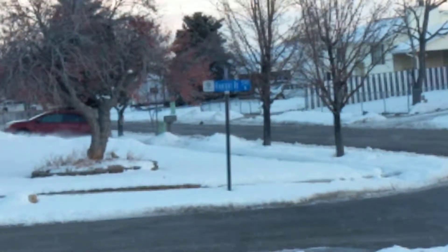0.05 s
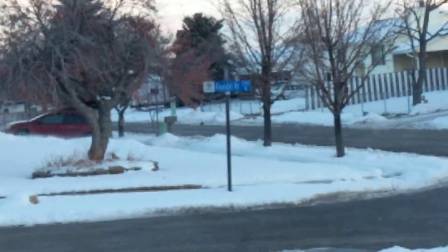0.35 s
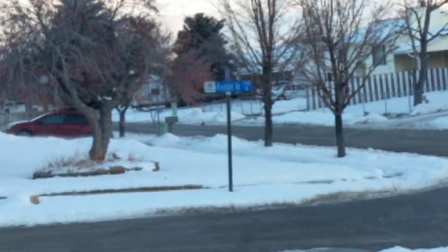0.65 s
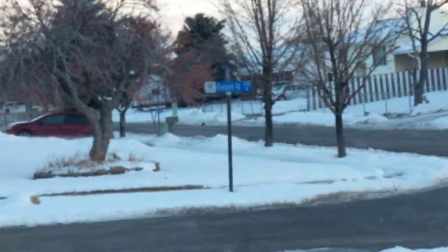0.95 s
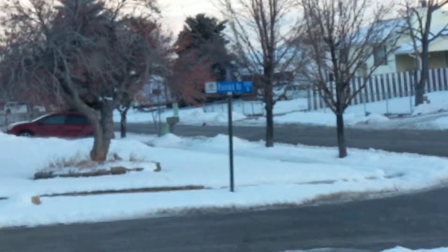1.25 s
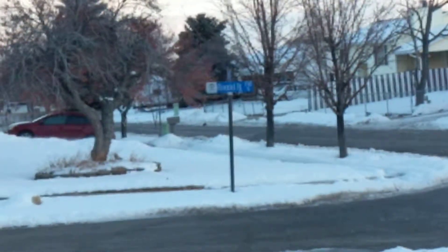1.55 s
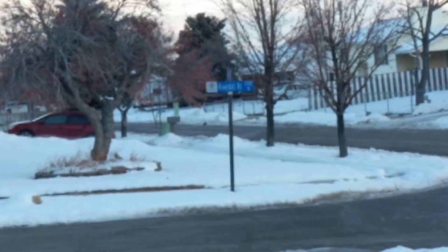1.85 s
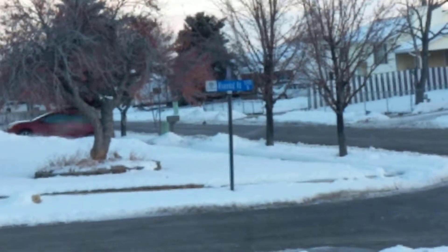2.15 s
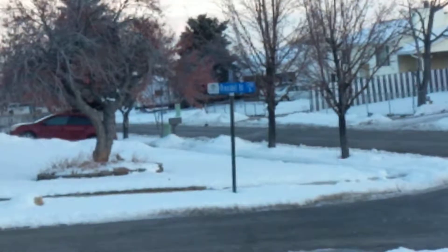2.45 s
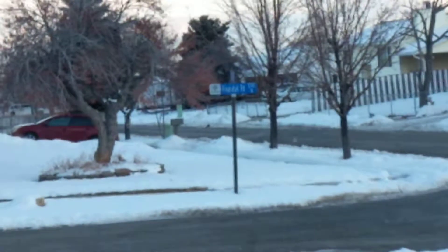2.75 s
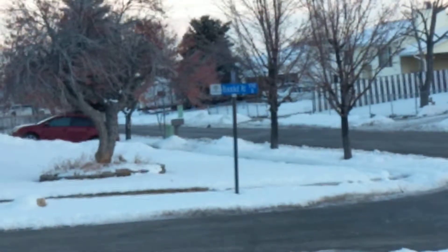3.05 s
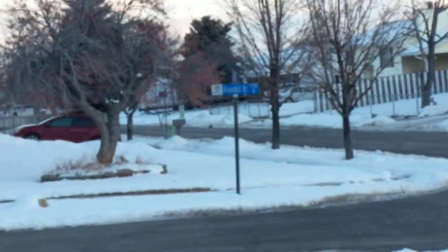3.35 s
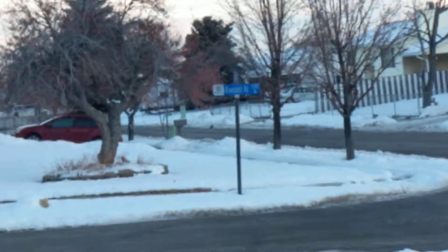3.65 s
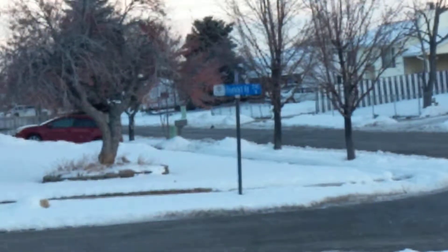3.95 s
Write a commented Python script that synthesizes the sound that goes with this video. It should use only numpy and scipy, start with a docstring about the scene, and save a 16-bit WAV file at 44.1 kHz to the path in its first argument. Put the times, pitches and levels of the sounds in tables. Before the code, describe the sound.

Wind flutters against the microphone with a low rumble, first in a few short puffs, then in a stronger gust towards the end. Behind it, a quiet street holds faint far-off traffic and air rushing softly through bare trees.

```python
"""A quiet, snowy residential street. Puffs of light wind bump against the microphone: a cluster after
two seconds and a stronger gust near the end. Each puff is a dull flutter of pressure from large eddies,
brightened by small ones. Behind them distant traffic murmurs, with tyre noise and one engine's drone,
and a soft rush of air in the bare trees lies over the even hiss of the microphone."""
import sys
import numpy as np
from scipy import signal
from scipy.fft import rfft, irfft, next_fast_len
from scipy.io import wavfile
from scipy.ndimage import uniform_filter1d, map_coordinates

SR = 44100
rng = np.random.default_rng(int(sys.argv[2]) if len(sys.argv) > 2 else 0)


def transcribe(u):
    """Save the signal u as a 16-bit wav file named by the first command-line argument.

    u: samples, shape (n,) or (channels, n), limited to [-1, 1]; the rate is SR.
    q: integer samples, one column per channel.
    """
    v = np.clip(np.atleast_2d(u).T, -1, 1)
    q = np.round(v * 32767).astype(np.int16)
    wavfile.write(sys.argv[1], SR, q)


N = 176400

# Wind hits on the microphone: start_s, hold_s, level_db, small_eddies_relative_db
WIND_PUFFS = [(1.696, .01, -46, -15.5), (1.742, 0.009, -52, -16), (1.843, 0.015, -56, -16),
              (1.932, 0.046, -53, -29), (2.067, 0.023, -40.5, -26), (2.206, 0.024, -42, -25),
              (2.242, 0.029, -39.5, -16), (2.309, 0.03, -51, -21), (2.374, 0.027, -43.5, -26),
              (2.456, 0.017, -43, -12), (2.513, 0.053, -51, -6.5), (2.935, 0.023, -49.5, -10),
              (3.150, 0.016, -56, -16), (3.267, .05, -58.5, -20), (3.324, .065, -49.5, -21),
              (3.527, 0.029, -53, -17), (3.579, .035, -46.5, -19), (3.627, 0.031, -43, -10.5),
              (3.686, 0.085, -43, -10), (3.749, 0.027, -37.5, -3.5), (3.787, 0.027, -35, -19),
              (3.836, .015, -43.5, -5), (3.886, 0.028, -37.5, -20), (3.97, .04, -50.5, -16.5)]
# The deep body of a puff: frequency_hz, level_db
LARGE_EDDY_TONE = [(12, -40), (22, -23.5), (32, -11.5), (48, 4), (72, 3.5), (105, -10), (150, -27),
                   (260, -49), (500, -68), (1000, -100)]
# Its brighter flutter: frequency_hz, level_db
SMALL_EDDY_TONE = [(30, -25), (80, 4), (125, 7), (170, -3), (240, -14.5), (400, -26), (600, -45),
                   (1200, -99)]

def wind():
    """Eddies buffet the microphone in puffs that rise, hold and die away, with the deepest lows cut."""
    attack_s, decay_s, low_cut_hz = 0.011, 0.015, 31
    t = np.arange(N) / SR
    large_power, small_power = np.zeros(N), np.zeros(N)
    for start_s, hold_s, level_db, small_relative_db in WIND_PUFFS:
        rise = np.sin(np.pi / 2 * np.clip((t - start_s) / attack_s, 0, 1)) ** 2
        fall = np.exp(-np.maximum(t - start_s - attack_s - hold_s, 0) / decay_s)
        large_power += (amp(level_db) * rise * fall) ** 2
        small_power += (amp(level_db + small_relative_db) * rise * fall) ** 2
    body = np.sqrt(large_power) * flutter(LARGE_EDDY_TONE, size=900)
    edge = np.sqrt(small_power) * flutter(SMALL_EDDY_TONE, size=1200)
    low_cut = signal.butter(2, low_cut_hz, "highpass", fs=SR, output="sos")
    return signal.sosfilt(low_cut, body + edge)


# Low rumble of far roads: frequency_hz, level_db
MURMUR_TONE = [(12, -53), (22, -29), (35, -8), (58, 2), (75, 0), (95, -6), (135, -6.5), (170, -13),
               (230, -11.5), (330, -22), (500, -37.5), (1000, -61), (4000, -90)]
# Fader ride on the rumble: time_s, level_db
MURMUR_RIDE = [(0, -60), (.7, -60), (1.35, -58.5), (2.0, -61), (2.8, -60), (3.2, -58.5), (4, -60)]
# Muffled wash of far tyres: frequency_hz, level_db
TYRE_TONE = [(60, -22), (250, 1), (420, 1), (600, -2.5), (1000, -8), (2000, -16), (5000, -43), (15000, -67)]
# Fader ride on the tyres: time_s, level_db
TYRE_RIDE = [(0, -72.5), (.8, -71.5), (1.25, -71), (1.9, -72), (2.45, -75.5), (2.65, -72), (3.2, -70),
             (3.5, -73.5), (4, -74)]

def traffic():
    """Far roads merge into a low murmur; tyre noise swells and ebbs above it."""
    murmur = amp(curve(MURMUR_RIDE) + 0.43 * wobble(4.2)) * flutter(MURMUR_TONE, size=6000)
    tyres = amp(curve(TYRE_RIDE) + 0.62 * wobble(10)) * noise(TYRE_TONE)
    return murmur + tyres


def engine_drone():
    """A far engine holds one low note, unsteady in pitch and level."""
    pitch_hz = 60.97 + 3.01 * wobble(5)
    level_db = -70.5 + 4.3 * wobble(8.3)
    phase = 2 * np.pi * np.cumsum(pitch_hz) / SR
    return amp(level_db) * np.sqrt(2) * np.sin(phase)


# Soft rush of air in the bare trees: frequency_hz, level_db
RUSH_TONE = [(100, -20), (700, -1), (1800, 1), (3500, -0.5), (5000, -3.5), (7500, -10), (11000, -20.5),
             (16000, -19)]
# Fader ride on the rush: time_s, level_db
RUSH_RIDE = [(0, -75), (1.35, -75.5), (1.9, -74.5), (2.5, -74.5), (2.85, -75.5), (3.35, -74.5),
             (3.55, -74.5), (4, -74.5)]
# Brief dips in the rush: centre_s, gain_db
RUSH_LULLS = [(.45, -2.5), (.98, -1.5), (2.03, -2.5), (2.74, -2.5)]
# The microphone's noise floor: frequency_hz, level_db
HISS_TONE = [(100, 0.5), (5000, -7.5), (10000, -1.5), (14000, -0.5), (16000, .5)]

def air_and_hiss():
    """Air rushes faintly through the trees over the microphone's hiss; both flicker slightly in level."""
    lull_half_width_s, hiss_db = 0.031, -80.5
    t = np.arange(N) / SR
    lull_db = sum(gain_db * np.exp(-((t - centre_s) / lull_half_width_s) ** 2)
                  for centre_s, gain_db in RUSH_LULLS)
    flicker_db = 0.6 * wobble(18) + 0.86 * wobble(90)
    rush = amp(curve(RUSH_RIDE) + lull_db + flicker_db) * noise(RUSH_TONE)
    hiss = amp(hiss_db + 0.5 * flicker_db + 0.6 * wobble(300)) * noise(HISS_TONE)
    return rush + hiss


def amp(db):
    """Decibels to gain."""
    return 10 ** (np.asarray(db) / 20)


def unit(x):
    """Scale to rms 1."""
    return x / np.sqrt(np.mean(x ** 2) + 1e-20)


def curve(points):
    """Straight ramps between (time_s, value) points, one value per sample."""
    return np.interp(np.arange(N) / SR, *np.transpose(points))


def wobble(rate):
    """A smooth random curve, rate knots a second."""
    knots = rng.standard_normal(int(N * rate / SR) + 4)
    return map_coordinates(knots, [np.arange(N) * rate / SR])


def noise(spectrum):
    """Noise of rms 1, shaped by a (frequency_hz, level_db) curve."""
    fft_size = next_fast_len(N + 8192)
    hz, db = np.transpose(spectrum)
    bin_hz = np.fft.rfftfreq(fft_size, 1 / SR)
    gain = amp(np.interp(np.log(bin_hz + 1), np.log(hz + 1), db))
    white = rng.standard_normal(fft_size)
    return unit(irfft(rfft(white) * gain, fft_size)[:N])


def flutter(spectrum, size):
    """Coloured noise whose strength is even over spans of size samples."""
    raw = noise(spectrum)
    power = np.abs(uniform_filter1d(np.abs(signal.hilbert(raw)) ** 2, size))
    return unit(raw / np.sqrt(uniform_filter1d(power, size // 2) + 1e-3))


def scene():
    """Wind up front, the street bed behind it, in mono."""
    street_bed = traffic() + engine_drone() + air_and_hiss()
    return (wind() + street_bed)[None]


def record(dry):
    """A brick-wall high cut takes off the very top of the mix."""
    high_cut_hz = 15800
    fft_size = next_fast_len(N + 8192)
    passband = np.fft.rfftfreq(fft_size, 1 / SR) < high_cut_hz
    return irfft(rfft(dry, fft_size) * passband, fft_size)[:, :N]


dry = scene()
out = record(dry)
transcribe(out)
```